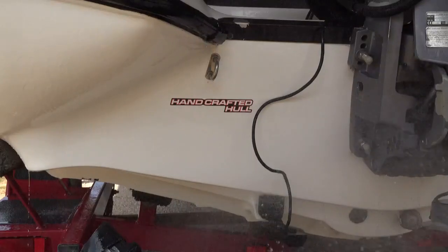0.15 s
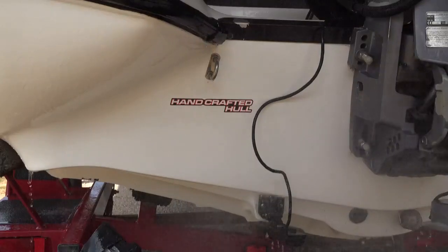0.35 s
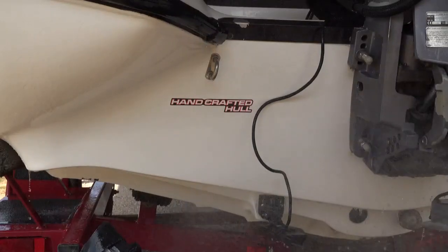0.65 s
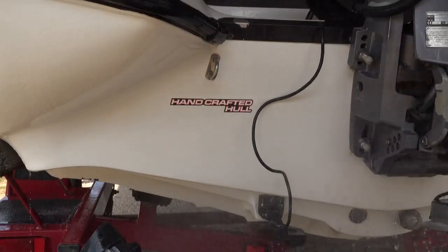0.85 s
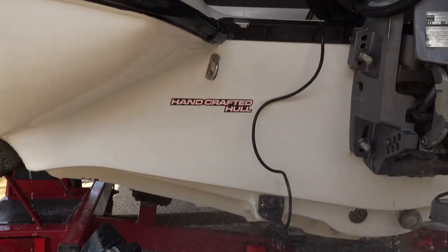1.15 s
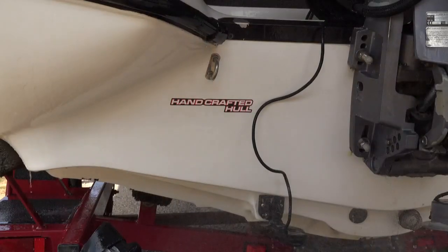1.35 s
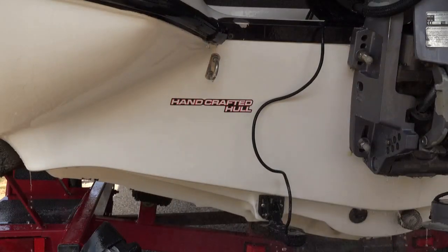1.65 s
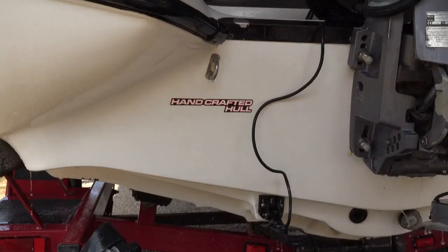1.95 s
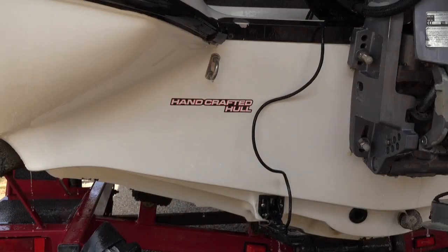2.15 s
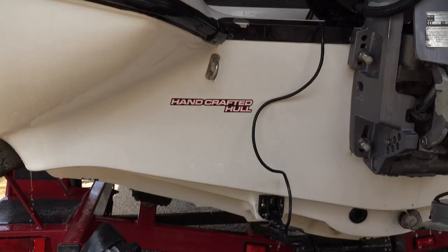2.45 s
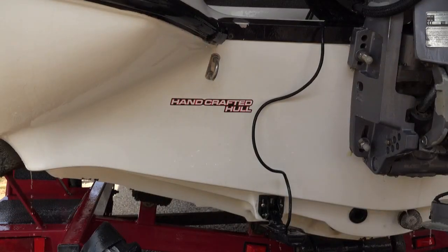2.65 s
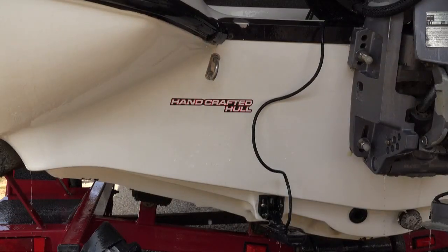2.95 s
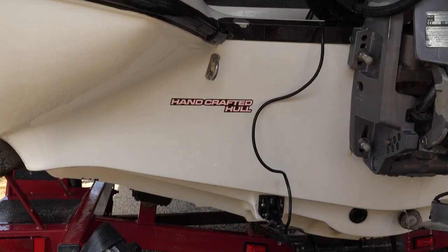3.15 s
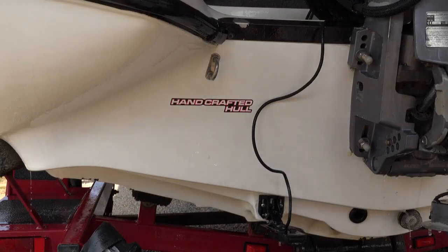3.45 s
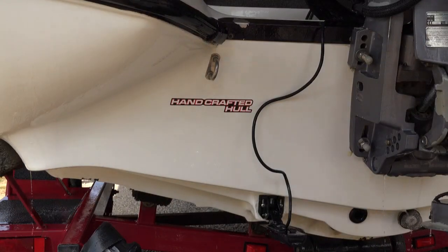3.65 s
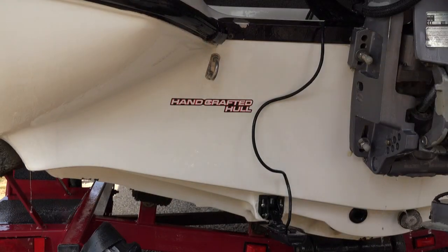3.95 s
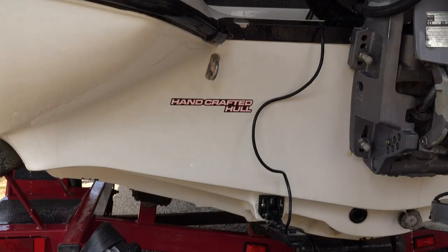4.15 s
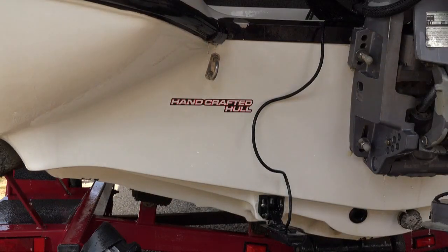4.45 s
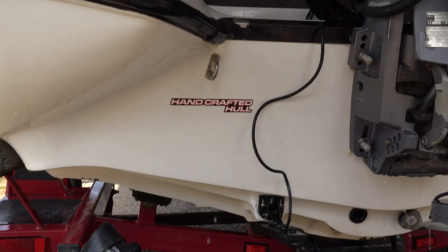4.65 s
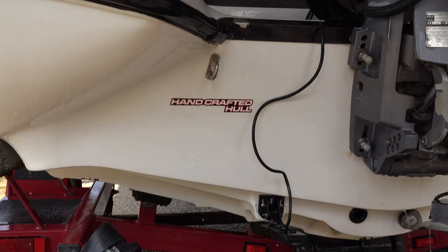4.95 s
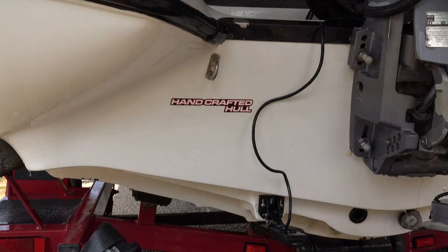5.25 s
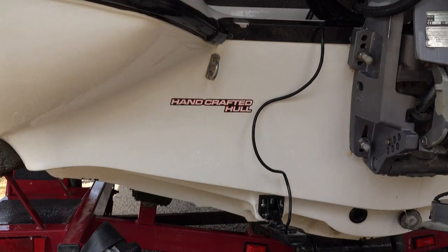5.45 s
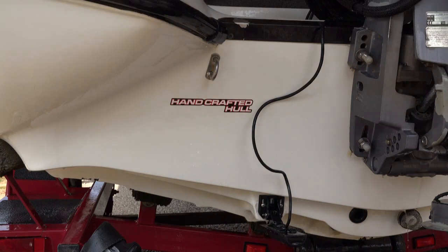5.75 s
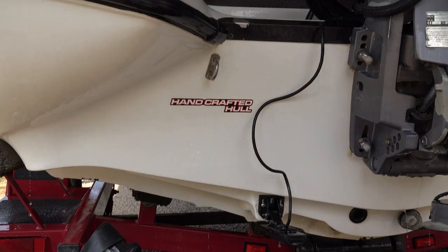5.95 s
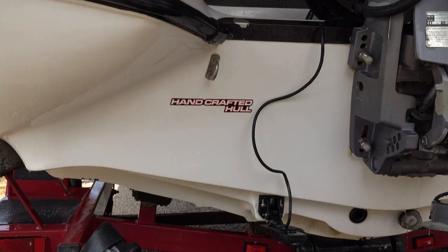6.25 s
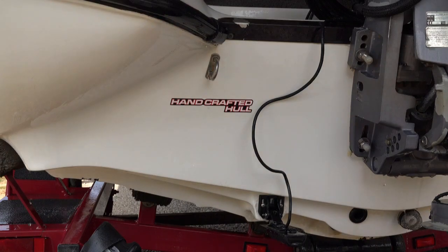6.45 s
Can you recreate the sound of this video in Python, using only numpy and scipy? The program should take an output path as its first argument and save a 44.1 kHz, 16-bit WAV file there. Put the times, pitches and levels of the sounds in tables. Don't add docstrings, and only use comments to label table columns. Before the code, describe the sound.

Close water spray on a hollow hull cuts out after two seconds; drops splat and plop, a nozzle clacks, soles scrape wet grit outdoors.

```python
import sys
import numpy as np
from scipy import signal
from scipy.fft import rfft, irfft, next_fast_len
from scipy.io import wavfile
from scipy.ndimage import uniform_filter1d

SR = 44100
rng = np.random.default_rng(int(sys.argv[2]) if len(sys.argv) > 2 else 0)


def voltage_ratio(decibels):
    exponent = np.asarray(decibels, float) / 20
    return 10 ** exponent


def persist_wave(psi):
    counts = np.round(np.clip(psi, -1, 1) * 32767).astype(np.int16)
    wavfile.write(sys.argv[1], SR, np.atleast_2d(counts).T)


N = 291501

# time_s, spray_db, slant_db (grazing is brighter), fan_db (wide fills the flanks), core_hz
JET_AIM = [(0.1, -21, -1, 2, 6530), (0.33, -20.5, -2.5, 2.5, 6100), (.45, -20.5, -5, 2.5, 5800),
           (0.58, -19.5, -2.5, 0, 6500), (.66, -19, -3, -1, 5860), (0.76, -18.5, -4, -3, 6200),
           (0.82, -21.5, 1.5, 0, 7600), (.95, -22.5, 1, 0, 7040), (1.1, -21, -1, -0.5, 6840),
           (1.21, -20, -1, -0.5, 7500), (1.33, -23, 0, 3.5, 7400), (1.5, -22, 0, 1, 6900),
           (1.57, -21, -1, 1.5, 6500), (1.66, -28.5, 3, 3, 6700), (1.84, -29, 2, -5, 6600),
           (2.06, -30, -1, 0.5, 6400), (2.12, -29.5, 3, -2, 7000), (2.17, -30, 2, -1.5, 6600)]
# freq_hz, density_db_per_hz
SPRAY_SPECTRUM = [(1470, -47), (2500, -31), (2970, -23), (4370, -6), (4730, -5), (5920, 1.5), (7630, 0),
                  (8910, -3.5), (10500, -7.5), (11000, -7), (14300, -28), (22000, -120)]
SPLASH_SPECTRUM = [(180, -13), (300, -8.5), (669, -6), (1150, -10), (1550, -7), (2910, -5), (3500, -1.5),
                   (4550, -12.5), (7700, -120)]
# start_s, path1_ms, path2_ms, path3_ms
BOUNCE_PATHS = [(0, 1.5, 2.61, 3.88), (.28, 1.68, 4.03, 2.98), (.45, 3.3, 1.84, 3.94),
                (.62, 1.32, 1.77, 3.98), (.79, 1.9, 3.45, 2.67), (.95, 2.74, 1.68, 3.76),
                (1.1, 1.98, 2.94, 2.38), (1.3, 1.9, 2.97, 2.55), (1.45, 2.97, 1.44, 2.4),
                (1.63, 3.21, 4.24, 4.58), (1.9, 1.41, 1.8, 2.92)]
BOUNCE_LEVELS_DB = [-10, -13, -14, -15, -16]

# start_s, peak_db, centre_hz
NEAR_DROPS = [(2.268, -28.5, 6800), (2.287, -28.5, 6160), (2.668, -39, 7170), (2.9115, -28.5, 6440),
              (3.4384, -30, 7010), (3.4434, -32, 6000), (3.4528, -30, 6300), (3.5045, -30, 6940),
              (3.5194, -32, 6600), (3.5803, -34, 6900), (3.802, -38, 5400), (3.8696, -29.5, 6500),
              (4.0585, -33, 5350), (4.1725, -31, 5900), (4.2838, -33.5, 6250), (4.325, -32, 7040),
              (4.356, -27.5, 5850), (4.3664, -32, 9790), (4.3914, -32.5, 5600), (4.509, -33.5, 7400),
              (4.552, -30.5, 5900), (5.1475, -32.5, 6500), (5.2383, -34, 8700), (5.367, -28.5, 8800),
              (5.4626, -33, 5750), (5.504, -32.5, 5630), (5.867, -33, 6950), (6.1791, -32.5, 7200),
              (6.3298, -34, 8700), (6.557, -29, 6800)]
# start_s, peak_db, centre_hz
FRAME_TAPS = [
    (2.7776, -41, 3760),
    (2.956, -38.5, 3290),
    (4.3534, -31, 3600),
    (4.4281, -40, 2660),
    (5.765, -38, 3150),
    (5.957, -42, 2610),
    (6.007, -35, 3750),
    (6.359, -36, 2800),
    (6.5129, -37, 2960),
]
# start_s, peak_db, centre_hz
KEEL_DROPS = [(2.339, -39, 6960), (2.364, -40, 7150), (2.447, -37.5, 5900), (2.4743, -36, 5400),
              (2.5007, -39, 7940), (2.5526, -37, 7200), (2.594, -32.5, 6600), (2.6374, -39, 6980),
              (2.6946, -36, 6450), (2.7157, -32.5, 6670), (2.8222, -36.5, 5920), (2.9844, -42, 6190),
              (3.023, -42, 5020), (3.0724, -36, 5830), (3.1018, -35.5, 6430), (3.1553, -37, 5600),
              (3.2241, -36, 6750), (3.238, -34, 6810), (3.6404, -37, 6190), (3.7294, -40, 5960),
              (3.7676, -42, 5300), (3.9694, -37, 7160), (4.01, -42, 6370), (4.626, -34, 5340),
              (4.651, -35.5, 6100), (5.0732, -33.5, 6900), (5.43, -37, 7150), (5.912, -37.5, 7010),
              (6.0836, -40, 6910), (6.1125, -42, 9500), (3.169, -34, 6550), (3.43, -34, 7500),
              (3.496, -31, 7500), (3.783, -37, 4300), (4.2695, -40, 5700), (5.482, -37, 5300),
              (5.088, -40, 3800)]
# start_s, peak_db, centre_hz
FURTHER_DROPS = [(2.4134, -41, 6880), (2.4566, -33, 5930), (2.5331, -36, 7750), (2.5715, -30, 7120),
                 (2.8739, -46, 4960), (2.978, -34, 7410), (3.049, -35, 4540), (3.1298, -41, 6520),
                 (3.3194, -43, 5960), (3.4164, -29, 6280), (3.475, -28, 5900), (3.5854, -29, 6300),
                 (3.6735, -46, 7000), (3.7213, -34, 5960), (3.808, -30, 5900), (3.906, -42, 7700),
                 (4.0154, -39, 4380), (4.0437, -41, 5170), (4.1086, -42, 5740), (4.1265, -36, 5590),
                 (4.1565, -36, 5660), (4.4283, -46, 6840), (4.4618, -43, 4290), (4.7122, -31, 5880),
                 (4.7765, -33, 6340), (5.032, -45, 7610), (5.0487, -33, 9920), (5.1073, -37, 5360),
                 (5.1243, -38, 6150), (5.1804, -37, 6020), (5.241, -33, 5270), (5.4176, -41, 7130),
                 (5.5434, -33, 9700), (5.5643, -37, 6120), (5.5952, -40, 5980), (5.6087, -40, 6730),
                 (5.6999, -40, 6040), (6.0676, -44, 6910), (6.1634, -42, 6400), (6.2183, -44, 5900),
                 (6.2801, -35, 5980), (6.442, -30, 6830), (6.4914, -35, 3100), (6.5959, -27, 8300)]
# start_s, peak_db, centre_hz, width_per_centre
PUDDLE_PLOPS = [(1.83, -42.5, 586, 0.44), (2.292, -43, 700, 1.4), (2.985, -45, 2230, 1.1),
                (3.476, -27, 1290, 1.6), (3.595, -42, 700, 1.8), (3.849, -48, 584, 1.4),
                (4.007, -41, 1000, 1.9), (4.323, -46, 2070, .5), (4.55, -39.5, 1000, 0.98),
                (5.15, -41, 820, 0.26), (5.422, -44.5, 1220, 0.39), (5.879, -37, 1230, 1.4),
                (6.004, -42, 1170, 1), (6.359, -40, 990, 0.76), (6.429, -30, 800, 0.96),
                (6.51, -47, 1000, 0.22), (6.57, -42, 740, .2)]

SNAP_TIMES_S = [3.3471, 3.3483, 3.3504, 3.3525, 3.3545, 3.356, 3.358, 3.3475, 3.365, 3.368, 3.396, 3.405,
                3.366, 3.4562]
# peak_db, centre_hz, t60_s
SNAP_KNOCKS = [(-4, 6700, 0.0082), (-7.5, 5800, 0.024), (-2, 7100, 0.0094), (-8, 10700, 0.046),
               (-18, 3000, 0.018), (-13, 4800, 0.029), (-31.5, 540, 0.052), (-30.5, 1350, 0.15),
               (-23, 4900, 0.02), (-31, 7000, 0.43), (-31, 6600, 0.093), (-26, 11000, 0.068),
               (-40, 2700, 0.41), (-21.5, 11200, .015)]

# peak_s, level_db, rise_s, fall_s (both per 20 dB), brightness_db_per_octave
SOLE_STROKES = [(3.372, -44, .004, 0.097, 10), (3.472, -43.5, 0.043, 0.15, 7),
                (4.02, -58, 0.037, 0.25, -3.5), (4.23, -49.5, 0.049, 0.036, 1.5),
                (4.66, -57.5, 0.041, 0.27, 9.5), (4.715, -46.5, 0.029, 0.044, 0.5),
                (4.844, -39.5, 0.15, 0.15, -0.5), (4.96, -60, 0.14, 0.87, 9.5),
                (5.609, -51, 0.012, 0.49, 3), (5.776, -49, 0.28, 0.17, -1.5), (6.005, -53, .01, 0.04, -3),
                (6.362, -47.5, 0.024, 0.11, 5.5), (6.48, -46.5, 0.18, 0.41, 1), (6.6, -49, 0.11, 0.13, 12)]
# freq_hz, density_db_per_hz
GRIT_SPECTRUM = [(300, -24), (600, -5), (1000, -3), (1600, 0), (2300, -4), (3200, -15), (6200, -21),
                 (11000, -28)]

# freq_hz, density_db_per_hz
RUNOFF_SPECTRUM = [(880, -7), (1500, 1), (3050, 2), (4940, 2.5), (6140, 6), (7560, 3.5), (8150, 0),
                   (9790, 0), (11000, 2), (14300, -41), (22000, -120)]
SHEET_SPECTRUM = [(300, -14), (500, -2), (750, 0), (1000, -5), (1400, -13), (2500, -20), (5000, -40)]

# start_s, length_s, start_hz, end_hz, level_db
BIRD_CHIRPS = [
    (2.742, 0.075, 4970, 4960, -57),
    (2.81, 0.087, 5000, 4900, -63),
    (5.195, 0.07, 4540, 5450, -53),
    (5.248, 0.033, 5600, 5850, -55),
    (6.024, 0.067, 4700, 4900, -59),
    (6.22, 0.045, 6060, 6900, -52.5),
    (6.335, 0.037, 6100, 6500, -47),
]

# time_s, rumble_db, motor_load_db
LOW_RUMBLE = [(0.0, -49, -1), (0.2, -50.5, -4), (0.75, -52.5, -2), (0.95, -56, -4.5), (2.0, -55, -5.5),
              (2.5, -52.5, -10.5), (2.65, -50, -1.5), (3.3, -49.5, -7), (3.62, -47.5, 1.5), (3.8, -47, -5.5),
              (4.28, -47, -5), (4.38, -46.5, 2.5), (4.55, -45.5, -4), (5.15, -47.5, -6), (5.8, -44.5, -3.5),
              (5.92, -43.5, -2), (6.2, -44.5, -5), (6.61, -40, -3.5)]
# freq_hz, density_db_per_hz
TRAFFIC_SPECTRUM = [(32, -40), (55, -3), (97, 0.5), (240, -1.5), (283, -1), (410, -12.5), (554, -18),
                    (2110, -28), (3000, -36), (3900, -68), (6600, -120)]
WIND_SPECTRUM = [(12, 4.5), (25, 0.5), (45, -8.5), (80, -22), (200, -54)]
# centre_hz, width_hz, lift_db
MOTOR_DRONES = [(78.5, 7.2, 10.5), (117.5, 4.8, 5.5), (150, 17, 0), (209.4, 17, 4.5), (283.3, 14.8, 11.5),
                (404, 26, 4.5), (625, 12, 6)]
# peak_s, level_db, time_per_20db_s
WIND_GUSTS = [
    (.04, -34, 0.2),
    (.27, -42, 0.1),
    (.72, -59, 0.5),
    (1.08, -51, -1),
    (2.0, -57, 3.5),
    (4.35, -52, 0.7),
    (4.73, -38, 0),
    (5.34, -41.5, -0.1),
    (6.61, -43.5, 2.5),
]

# freq_hz, left_minus_right_db
PORT_LEAN = [(60, -16), (110, -11), (190, 9), (340, 4.5), (620, 3.5), (1100, 2), (1970, -1), (3530, 0),
             (6310, -7), (11300, -3)]
# freq_hz, left_lead_rad
PORT_LEAD = [(0, 0.46), (690, -0.19), (1210, -0.32), (3010, -0.32), (3620, -0.93), (4050, 0.054),
             (4480, -1.4), (5250, -0.59), (6120, 0.38), (6630, -0.89), (7490, 0.54), (8960, 0.55),
             (11100, 0.25), (11500, 0.3)]
# freq_hz, left_lead_rad
FEET_LEAD = [(300, 2), (600, -0.7), (1200, -2), (2500, -2.5), (6000, 0.45), (11000, 0)]
# freq_hz, likeness
NEAR_LIKENESS = [(60, 0.33), (220, 0.66), (820, 0.7), (3050, 0.87), (11300, 0.83)]
FAR_LIKENESS = [(60, 0.24), (220, 0.81), (820, 0.5), (3050, 0.11), (11300, 0.7)]
# freq_hz, likeness, left_minus_right_db, left_lead_rad
HOUSING = [(30, .9, -5, -.5), (65, .8, 1, -1), (115, .68, 7, -1.1), (170, .68, 1, -.7), (230, .68, 4, -.75),
           (290, .85, 7.5, -1.2), (380, .72, 6.5, -1.05), (600, .55, 3, -1), (1000, .55, 1.5, -.8)]


def evened(x):
    return x / np.sqrt(np.mean(x ** 2) + 1e-20)


def read(points, hz):
    f, value = np.transpose(points)
    return np.interp(np.log(hz + 1), np.log(f + 1), value)


def curves(rows, t):
    s, *columns = np.transpose(rows)
    return [np.interp(t, s, c) for c in columns]


def peak(t, s, db, rise_s, fall_s):
    rising = (s - t) / max(rise_s, .002)
    falling = (t - s) / max(fall_s, .002)
    return voltage_ratio(db - 20 * np.maximum(rising, falling))


def add(mix, s, sound):
    part = mix[round(s * SR):][:len(sound)]
    part += sound[:len(part)]


def hiss(colour, patchy_db, flicker_db, size, shift_db=lambda hz, t: 0, clumpy_db=0, count=N):
    hop = size // 4
    hz = np.fft.rfftfreq(size, 1 / SR)
    t = np.arange(4 * count // size + 5) * size / 4 / SR
    a, b, c, d, patches = rng.standard_normal((len(t), len(hz), 5)).T
    patches = evened(uniform_filter1d(uniform_filter1d(patches, size=5, axis=0), size=12, axis=1))
    clumps = evened(uniform_filter1d(uniform_filter1d(patches, size=6, axis=0), size=70, axis=1))
    flicker = evened(uniform_filter1d(rng.standard_normal(len(t)), size=3))
    level_db = read(colour, hz[:, None]) + shift_db(hz[:, None], t)
    level_db = level_db + patchy_db * patches + clumpy_db * clumps + flicker_db * flicker
    bins = np.array([a + 1j * b, c + 1j * d]) * voltage_ratio(level_db)
    x = signal.istft(bins, nperseg=size, noverlap=size - hop)[1][:, :count]
    return x / np.sqrt(uniform_filter1d((x ** 2).mean(0), size=SR // 4))


def burst(hz, width_hz, t60_s):
    t = np.arange(min(round(.7 * t60_s * SR) + 400, 8000)) / SR
    tick = 1 + 0.97 * np.exp(-t / 0.00019)
    puff = rng.standard_normal(len(t)) * voltage_ratio(-60 * t / t60_s) * tick
    r = np.exp(-np.pi * width_hz / SR)
    poles = [1, -2 * r * np.cos(2 * np.pi * hz / SR), r * r]
    ring = signal.lfilter([1], poles, signal.lfilter([1, 0, -1], poles, puff))
    thin_spray = evened(np.diff(puff, prepend=0))
    splat = evened(ring) + 0.083 * thin_spray
    return splat / abs(splat).max()


def scattered(x, t60_s):
    t = np.arange(3000) / SR
    taps = rng.standard_normal(len(t)) * voltage_ratio(-60 * t / t60_s)
    return np.array([x, signal.oaconvolve(x, taps / np.linalg.norm(taps))[:N]])


def ports(pair, likeness, lean_db=PORT_LEAN, lead_rad=PORT_LEAD):
    size = next_fast_len(N)
    hz = np.fft.rfftfreq(size, 1 / SR)
    same = np.clip(read(likeness, hz), 0, 1)
    direct, other = rfft(pair, size)
    both = np.sqrt((1 + same) / 2) * direct
    apart = np.sqrt((1 - same) / 2) * other
    lean = voltage_ratio(read(lean_db, hz) / 2) * np.exp(.5j * read(lead_rad, hz))
    return irfft(np.array([(both + apart) * lean, (both - apart) / lean]), size)[:, :N]


def jet_slip(t):
    start_s, length_s, ramp_s = 0.164, 0.119, .008
    return np.interp(t - start_s, [0, ramp_s, length_s - ramp_s, length_s], [0, 1, 1, 0])


def jet_aim_db(hz, t):
    _, slant_db, fan_db, core_hz = curves(JET_AIM, t)
    fan_db = fan_db + 2.5 * jet_slip(t)
    core = 1 * np.exp(-((hz - core_hz) / 770) ** 2)
    low = np.interp(hz, [4400, 5900], [1, 0])
    high = np.interp(hz, [6500, 8300, 9500, 11100], [0, 0.74, 1, 0.19])
    return core + (fan_db - slant_db) * low + (fan_db + slant_db) * high


def bounced(direct):
    n = np.arange(direct.shape[1])
    start_s, *paths_ms = np.transpose(BOUNCE_PATHS)
    paths_ms += list(rng.uniform(1.1, 5.5, (len(start_s), 2)).T)
    aim = np.searchsorted(start_s, n / SR, "right") - 1
    late = [direct[:, n - np.round(ms * SR / 1000).astype(int)[aim]] for ms in paths_ms]
    return direct + np.tensordot(voltage_ratio(BOUNCE_LEVELS_DB), late, 1)


def jet():
    shut_s, valve_s, valve_db_per_s = 2.179, 0.13, -480
    count = round((shut_s + valve_s) * SR)
    t = np.arange(count) / SR
    flow_db = curves(JET_AIM, t)[0] + valve_db_per_s * np.maximum(t - shut_s, 0)
    spray_db = flow_db - 7.5 * jet_slip(t)
    splash_db = -33 - 5.5 * t + 0.89 * np.minimum(flow_db + 22, 0)
    direct = hiss(SPRAY_SPECTRUM, 1.0, 0.53, size=256, shift_db=jet_aim_db, clumpy_db=0.9, count=count)
    splash = hiss(SPLASH_SPECTRUM, 1.88, 0.39, size=512, count=count)
    both = voltage_ratio(spray_db + 3.0) * evened(bounced(direct)) + voltage_ratio(splash_db + 3.0) * splash
    return np.pad(both, [(0, 0), (0, N - count)])


def drips():
    keel_db, further_db, plop_t60_s = -0.5, -5.6, 0.074
    out = np.zeros(N)
    for drops, offset_db in [(NEAR_DROPS, 0), (FRAME_TAPS, 0), (KEEL_DROPS, keel_db), (FURTHER_DROPS, further_db)]:
        for s, db, hz in drops:
            db = db + offset_db
            t60_s = 0.023 * voltage_ratio(0.21 * (db + 38.5))
            add(out, s, voltage_ratio(db) * burst(hz, 0.57 * hz, t60_s))
    for s, db, hz, share in PUDDLE_PLOPS:
        add(out, s, voltage_ratio(db) * burst(hz, share * hz, plop_t60_s))
    return scattered(out, .03)


def snap():
    out = np.zeros(N)
    for s, (db, hz, t60_s) in zip(SNAP_TIMES_S, SNAP_KNOCKS):
        add(out, s, voltage_ratio(db) * burst(hz, 0.72 * hz, t60_s))
    return scattered(out, 0.031)


def strokes(t):
    return np.array([peak(t, *row[:4]) for row in SOLE_STROKES])


def grit_tilt_db(hz, t):
    power = strokes(t) ** 2
    db_per_octave = np.array(SOLE_STROKES)[:, 4] @ power / (power.sum(0) + 1e-12)
    return db_per_octave * np.log2(np.maximum(hz / 1100, 1))


def scuffs():
    stroke = np.sqrt((strokes(np.arange(N) / SR) ** 2).sum(0))
    grit = hiss(GRIT_SPECTRUM, 1.0, 0.89, size=256, shift_db=grit_tilt_db)
    stones = np.minimum(rng.exponential(1, N // 60 + 1), 4)
    grains = evened(voltage_ratio(1.3 * stones.repeat(60)[:N]))
    return voltage_ratio(8.0) * uniform_filter1d(stroke, size=200) * grit * grains


def runoff():
    t = np.arange(N) / SR
    drops_per_s, kinds = 170, 20
    size = voltage_ratio(4.0 * np.minimum(rng.exponential(1, N), 2.8)) * (rng.random(N) < drops_per_s / SR)
    kind = rng.integers(0, kinds, N)
    drops = np.zeros(N)
    for k, hz in enumerate(np.geomspace(3500, 9500, kinds)):
        drops += signal.oaconvolve(size * (kind == k), burst(hz, 1.15 * hz, 0.047))[:N]
    fizz = hiss(RUNOFF_SPECTRUM, 2.2, 1.8, size=256)
    bed = voltage_ratio(-0.5) * fizz + voltage_ratio(0.5) * evened(scattered(drops, 0.056))
    trickle = voltage_ratio(-51 - .5 * (t - 1.5))
    squeeze_db, squeeze_top_db = 3.5, -47
    squeeze = uniform_filter1d(strokes(t)[2:].sum(0), size=6000, origin=2400)
    pressed = voltage_ratio(squeeze_top_db) * np.tanh(voltage_ratio(squeeze_db - squeeze_top_db) * squeeze)
    return voltage_ratio(-5.5) * np.hypot(trickle, pressed) * bed * (t > 2.18)


def drain():
    start_s, end_s, rise_s, fade_s = 2.24, 2.806, 0.024, 0.024
    count = round(end_s * SR)
    t = np.arange(count) / SR - start_s
    gate = np.clip(t / rise_s, 0, 1) * np.clip((t[-1] - t) / fade_s, 0, 1)
    level = voltage_ratio(-57.5 - 6 * t + 4.0)
    wash = gate * level * hiss(SHEET_SPECTRUM, 3.6, 0.79, size=512, count=count)
    return np.pad(wash, [(0, 0), (0, N - count)])


def bird():
    out = np.zeros(N)
    for s, length_s, start_hz, end_hz, db in BIRD_CHIRPS:
        hz = np.linspace(start_hz, end_hz, round(length_s * SR))
        waver = evened(uniform_filter1d(rng.standard_normal(4000), size=90))[:len(hz)]
        hz = hz * (1 + 0.035 * waver)
        add(out, s, voltage_ratio(db) * np.sin(2 * np.pi * np.cumsum(hz) / SR) * np.hanning(len(hz)))
    return scattered(scattered(out, 0.12).sum(0), .1)


def drone_db(hz, t):
    drones = sum(db / (1 + (2 * (hz - f) / width) ** 2) for f, width, db in MOTOR_DRONES)
    band = (hz > 230) * (hz < 470)
    load_db = curves(LOW_RUMBLE, t)[1]
    return drones + 2.86 * band + load_db * (np.exp(-((hz - 281) / 43) ** 2) + 0.38 * band)


def air():
    t = np.arange(N) / SR
    calm_db = -64.5
    gusts = voltage_ratio(calm_db) + sum(peak(t, s, db, fall_s, fall_s) for s, db, fall_s in WIND_GUSTS)
    traffic = voltage_ratio(curves(LOW_RUMBLE, t)[0] + 4.0) * hiss(TRAFFIC_SPECTRUM, 1.0, 0.89, size=4096, shift_db=drone_db)
    wind = voltage_ratio(4.0) * gusts * hiss(WIND_SPECTRUM, 1.0, 1.4, size=4096)
    likeness, lean_db, lead_rad = (np.array(HOUSING)[:, [0, k]] for k in (1, 2, 3))
    return ports(traffic + wind, likeness, lean_db, lead_rad)


def scene():
    near = ports(jet() + drips() + snap(), NEAR_LIKENESS)
    feet = ports(scuffs(), [(600, 0.58), (6000, 0.91)], lead_rad=FEET_LEAD)
    far = ports(runoff() + drain() + bird(), FAR_LIKENESS)
    return near + feet + far + air()


def roll_off(x):
    return signal.sosfilt(signal.butter(12, 11890, fs=SR, output="sos"), x)


def record(dry):
    edge = signal.firwin(1501, 11010, window=("kaiser", 4.5), fs=SR)
    x = signal.oaconvolve(dry, edge[None], "same")
    knee, room = .72, .15
    over = np.maximum(abs(x) - knee, 0)
    mix = x - np.sign(x) * (over - room * np.tanh(over / room))
    return roll_off(mix)


dry = scene()
out = record(dry)
persist_wave(out)
```